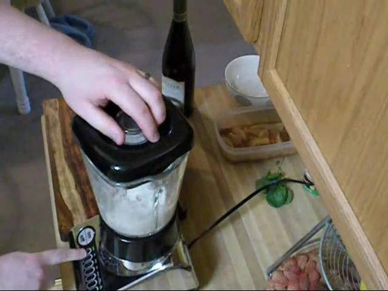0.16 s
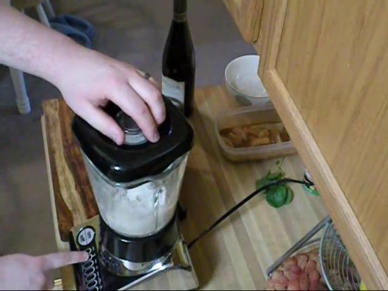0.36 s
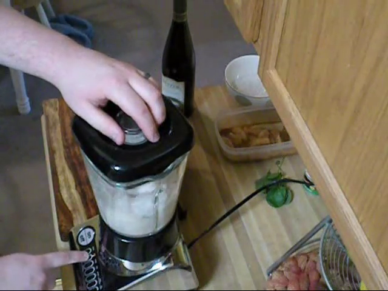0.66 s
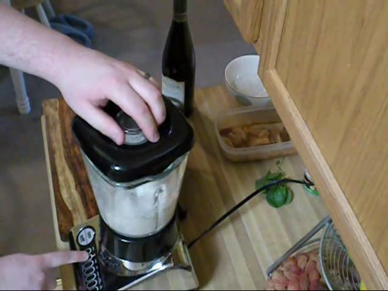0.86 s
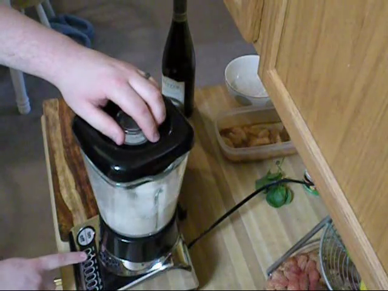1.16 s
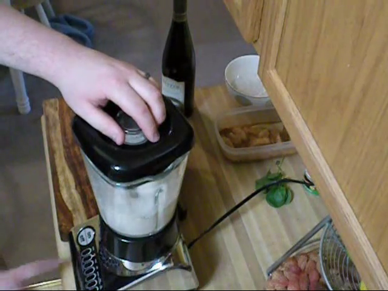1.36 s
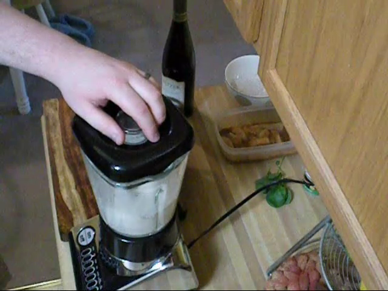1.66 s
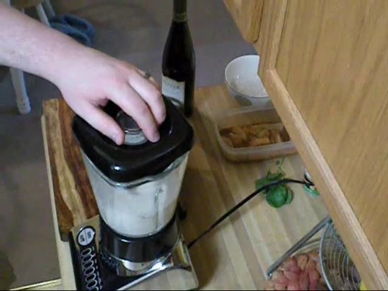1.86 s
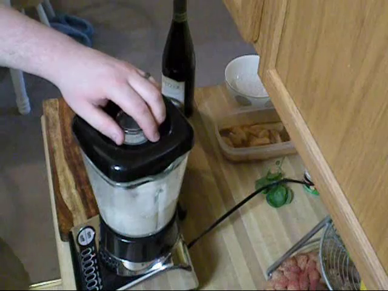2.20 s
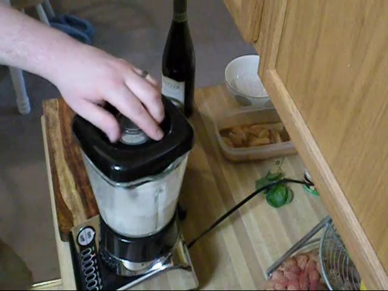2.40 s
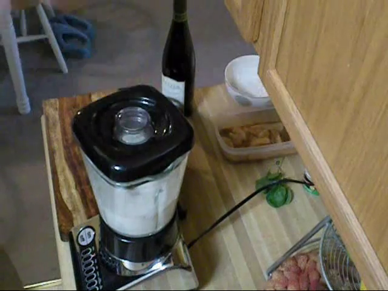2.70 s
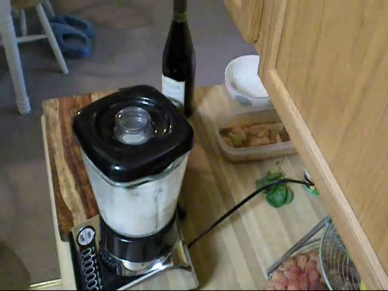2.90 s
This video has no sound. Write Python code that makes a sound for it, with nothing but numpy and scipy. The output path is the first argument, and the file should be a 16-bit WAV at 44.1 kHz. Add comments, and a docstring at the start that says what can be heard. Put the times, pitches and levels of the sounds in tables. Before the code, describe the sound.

After a brief near-quiet with small plastic clicks, a blender snaps on and runs loudly to the end, buzzing and whining upward while chunks rattle the jar; short room echo, coarse, gritty small-camera sound.

```python
"""A kitchen blender whines: its motor comes on after 0.6 s and its whine climbs as it gathers speed,
its torque pulsing at twice the mains rate. Before that a finger ticks on the plastic buttons and the
switch snaps: short noise rings the panel. Blades churn the food (gritty noise), the housing drones
(shaken resonances), chunks knock the glass jar. The kitchen adds a short echo and faint noise.
A small camera stores 8 bits at about 8 kHz and plays each value held flat."""
import sys
import numpy as np
from scipy import signal
from scipy.fft import rfft, irfft
from scipy.io import wavfile
from scipy.ndimage import uniform_filter1d, map_coordinates

SR = 44100
rng = np.random.default_rng(int(sys.argv[2]) if len(sys.argv) > 2 else 0)


def decibels_to_gain(level_db):
    """Convert a level in decibels to a linear amplitude gain (20 dB per decade)."""
    exponent = np.asarray(level_db, float) / 20
    return 10 ** exponent


def persist_wave(psi):
    """Save psi, clipped to +-1, as 16-bit WAV."""
    counts = np.round(np.clip(psi, -1, 1) * 32767).astype(np.int16)
    wavfile.write(sys.argv[1], SR, np.atleast_2d(counts).T)


N = 134505
T = np.arange(N) / SR
START_S = 0.619  # the motor comes on


def level(x, db):
    """Scale a sound to an rms level."""
    return x * decibels_to_gain(db) / np.sqrt(np.mean(x ** 2))


def column(table, index):
    """Draw one column of a table as a curve over time, one value per sample."""
    rows = np.array(table, float)
    return np.interp(T, rows[:, 0], rows[:, index])


def coloured(x, points):
    """Filter x by a spectrum drawn through (f/Hz, level/dB) points, straight over log frequency."""
    hz, db = np.array(points, float).T
    f = np.maximum(np.arange(len(x) // 2 + 1) * SR / len(x), 1)
    gain = decibels_to_gain(np.interp(np.log(f), np.log(hz), db))
    return irfft(rfft(x) * gain, len(x))


def ring(x, hz, t60):
    """One resonance struck by x: it swings at hz and fades by 60 dB in t60 seconds."""
    r = np.exp(-np.log(1000) / (t60 * SR))
    w = 2 * np.pi * hz / SR
    return signal.lfilter([0, np.sin(w)], [1, -2 * r * np.cos(w), r * r], x)


def walk(rate):
    """A smooth random curve: new values at this rate per second, smoothed twice to a spread of about 1."""
    k = int(SR / rate)
    steps = np.repeat(rng.standard_normal(N // k + 1), k)
    smooth = uniform_filter1d(uniform_filter1d(steps, k), k)
    return 1.234 * smooth[:N]


def resonances(table, flicker_db):
    """Resonances shaken by noise, each flickering alone."""
    out = np.zeros(N)
    for hz, width, db in table:
        t60 = np.log(1000) / (np.pi * width)
        shaken = ring(rng.standard_normal(N), hz, t60)
        out += level(shaken, db) * decibels_to_gain(flicker_db * walk(15))
    return out


# Colour of the kitchen's background noise: f/Hz, relative level/dB per Hz
KITCHEN_COLOUR = [(18, -56), (30, -28.5), (178, -13), (210, -8.5), (242, -8), (291, -3.5), (412, -7.5),
                  (1660, -13), (4000, -21.5), (5200, -53), (8800, -120)]


def kitchen_noise():
    """Faint noise of the kitchen, wavering slightly in level."""
    noise = coloured(rng.standard_normal(N), KITCHEN_COLOUR)
    return level(noise, -47) * decibels_to_gain(1.5 * walk(21))


# Resonances of the plastic panel: f/Hz, relative level/dB, t60/s
PLASTIC = [(228, -19, 0.036), (650, -15.5, 0.035), (902, -1, 0.033), (1383, -5, 0.031), (2100, -12, .015),
           (2530, -9, 0.01), (2820, -1.5, .015), (3026, 0, 0.017), (3430, -1, 0.013), (3730, -3, 0.02),
           (3830, -11, 0.0099)]
# Scrapes on the buttons, the last is the switch:
# t/s, relative level/dB, fade time constant/s, treble tilt of the ringing/dB per octave
BUTTONS = [(.002, -44.5, .02, 4), (0.07, -27, 0.01, 1.5), (.091, -35.5, 0.0046, 1.3),
           (.105, -42, 0.018, 3.5), (.35, -43.5, 0.019, 4), (.372, -41, 0.011, 2.5), (0.441, -38, 0.018, 0),
           (0.556, -43.5, .015, 0), (0.578, -39, 0.016, 6), (0.6194, -13, 0.0041, 7)]


def buttons():
    """Short scrapes of a finger or the switch crackle and ring the plastic panel."""
    contact_rise_s = 0.0012
    crack_db = 19  # broad noise of the contact beside the ringing
    out = np.zeros(N)
    for s, db, length, tilt_db in BUTTONS:
        rise = np.clip((T - s) / contact_rise_s, 0, 1)
        fade = np.exp(-np.maximum(T - s, 0) / length)
        scrape = rng.standard_normal(N) * rise * fade / np.sqrt(length * SR)
        # differences between neighbouring samples favour the treble
        out += decibels_to_gain(db + crack_db) * signal.lfilter([1, -1], [1], scrape)
        for hz, mode_db, t60 in PLASTIC:
            tilt = tilt_db * np.log2(hz / 1000)
            out += decibels_to_gain(db + mode_db + tilt) * ring(scrape, hz, t60)
    return out


def kitchen_echo(dry):
    """The walls answer after 4 ms with a dense echo: noise that fades by 60 dB in t60_s."""
    t60_s, echo_db = 0.3, -17
    t = T[:SR // 2]
    tail = rng.standard_normal(len(t)) * np.exp(-np.log(1000) * t / t60_s) * (t > 0.004)
    tail = tail / np.sqrt(np.sum(tail ** 2))
    return decibels_to_gain(echo_db) * signal.fftconvolve(dry, tail)[:N]


def motor_phase():
    """Phase of the whine in radians: its pitch, wavering a little, added up over time."""
    waver_hz = 4.5
    hz = column(WHINE, index=1) + waver_hz * walk(25.15)
    return 2 * np.pi * np.cumsum(hz) / SR


def mains_phase():
    """Phase in radians of the torque pulses, at twice the mains rate."""
    pulse_hz = 120
    return 2 * np.pi * pulse_hz * T


# The motor's whine and its side lines: t/s, whine f/Hz, then the middle level/dB of the lines
# 3, 2 and 1 mains pulses below the whine, of the whine itself, and of the line 1 pulse above
WHINE = [(.62, 1306, -59, -44, -33, -32, -33), (.78, 1319, -48, -35.5, -37, -55, -34),
         (.885, 1328, -34, -42, -43, -40, -27), (.94, 1339, -48, -54, -40, -29, -28.5),
         (1.02, 1366, -42, -51, -33, -43, -26), (1.16, 1391, -46, -34, -29, -33, -23),
         (1.26, 1393, -35, -36, -32, -45, -31), (1.34, 1395, -46, -32, -31, -27, -23.5),
         (1.42, 1421, -47, -42, -25.5, -25, -40), (1.5, 1442, -60, -40, -25, -19, -32),
         (1.62, 1463, -40, -29, -60, -25.5, -27.5), (1.7, 1475, -41, -34, -53, -24, -38),
         (1.78, 1492, -38, -48, -36, -18, -35), (1.9, 1517, -25.5, -29, -20.5, -24, -27),
         (1.98, 1519, -36, -29, -27.5, -24, -37), (2.06, 1522, -32, -25.5, -21.5, -28, -31),
         (2.18, 1539, -25.5, -20.5, -24.5, -25, -32.5), (2.32, 1548, -37, -28.5, -27, -21.5, -31.5),
         (2.42, 1555, -39, -25, -18, -23, -32), (2.54, 1540, -37, -28.5, -28, -21.5, -41),
         (2.64, 1556, -38, -25, -16, -30, -30), (2.7, 1564, -38, -29, -19.5, -37, -48),
         (2.78, 1578, -39, -46, -19.5, -28, -30), (2.86, 1586, -38, -41, -22.5, -30, -36),
         (2.94, 1563, -28, -49, -19.5, -29, -41), (3.05, 1574, -40, -44, -18.5, -28, -49)]


def whine(phase):
    """The motor whines; its pulsing torque adds lines spaced by the mains pulse, each flickering."""
    flicker_db = 1.5
    out = np.zeros(N)
    for k in range(5):
        db = column(WHINE, index=k + 2) + flicker_db * walk(45)
        side = (k - 3) * mains_phase()
        out += decibels_to_gain(db) * np.sin(phase + side + 2 * np.pi * rng.random())
    return out


# Mains hum: multiple of the mains pulse, middle level/dB
HUM = [(2, -35), (3, -35), (7, -36), (12, -37)]


def mains_hum():
    """Tones at multiples of the mains pulse, each wavering in level."""
    out = np.zeros(N)
    for k, db in HUM:
        tone = np.sin(k * mains_phase() + 2 * np.pi * rng.random())
        out += decibels_to_gain(db + 3.6 * walk(8)) * tone
    return out


# Thin treble tone: t/s, middle f/Hz, middle level/dB
RUN_UP = [(.63, 1900, -57), (.68, 2080, -48), (.74, 2700, -52), (.775, 3000, -32), (.82, 3180, -28),
          (.86, 3260, -32), (.91, 3330, -37), (.97, 3400, -55), (1.05, 3420, -80)]


def run_up():
    """A thin treble tone climbs while the motor gathers speed."""
    hz = column(RUN_UP, index=1) + 25 * walk(80)
    db = column(RUN_UP, index=2) + 2.5 * walk(73)
    return decibels_to_gain(db) * np.sin(2 * np.pi * np.cumsum(hz) / SR)


# Levels while the blender works, also used by the functions further down: t/s, then as level/dB:
# churning, housing drone, jar's rattle, housing's upper ring (all four added to the sound's own level),
# and the middle level of the shaft tone
LOAD = [(.63, -30, -14.5, -33, -39, -68), (.652, -32, -14.5, -33, -34, -71),
        (.73, -33, -19.5, -31, -30, -66), (.755, -27, -22, -21, -26, -69),
        (.8, -30.5, -15.5, -20, -23, -77), (.84, -36, -17.5, -21, -31, -56),
        (.88, -30.5, -17, -27, -14.5, -55), (.96, -30, -17.5, -19.5, -26.5, -68),
        (1.1, -24.5, -22, -26, -26.5, -62), (1.25, -25.5, -21.5, -30, -23, -53),
        (1.33, -25.5, -19.5, -22, -16, -49.5), (1.45, -27.5, -22, -25, -35, -47),
        (1.65, -24, -21.5, -20.5, -35.5, -49.5), (1.85, -24.5, -22, -39, -27, -46.5),
        (2.07, -24, -24.5, -29.5, -28, -61), (2.25, -25, -22.5, -25, -33, -54),
        (2.4, -25.5, -22.5, -33, -30.5, -57.5), (2.55, -26, -30.5, -24.5, -32.5, -47),
        (2.7, -26, -23, -23.5, -32, -52), (2.85, -24.5, -27.5, -27.5, -27, -48),
        (3.05, -25, -18, -30, -31, -55)]


def shaft_tone(phase):
    """The shaft hums low, one turn for every 14 swings of the whine, with a loose phase."""
    db = column(LOAD, index=5) + 3 * walk(20)
    return decibels_to_gain(db) * np.sin(phase / 14 + 0.8 * walk(12))


def motor():
    """All tones of the motor; whine and shaft share one rotation."""
    phase = motor_phase()
    tones = whine(phase) + mains_hum() + run_up() + shaft_tone(phase)
    return np.sqrt(2) * tones  # so that tone levels are rms


# Colour of the churning: f/Hz, relative level/dB per Hz
CHURN_COLOUR = [(18, -50), (30, -39), (54, -29), (145, -17), (237, 0.5), (496, -5.5), (621, 6.5),
                (778, -8.5), (1470, -9), (1730, -6.5), (4000, -2.5), (5200, -24), (8800, -120)]


def churn():
    """Blades whip the food: noise with a quick random flutter that makes it gritty."""
    grit = rng.standard_normal(N) * decibels_to_gain(1.77 * walk(250) + 1.05 * walk(20))
    return level(coloured(grit, CHURN_COLOUR), 4.5) * decibels_to_gain(column(LOAD, index=1))


# Resonances of housing and counter: f/Hz, width/Hz, relative level/dB
HOUSING = [(165, 13, -42), (224, 19, -30.5), (283, 20, -32), (352, 18, -34), (420, 69, -31.5),
           (564, 20, -35.5), (734, 47, -39), (880, 33, -31.5), (937, 57, -31), (1175, 87, -29.5),
           (1440, 83, -31.5), (1620, 180, -34.5), (1893, 54, -37), (2268, 52, -37.5), (2738, 32, -38.5)]
# Droning resonances of the housing: f/Hz, width/Hz, level/dB over the load curve
DRONE = [(634, 24, -3), (683, 24, -6)]
# The housing's upper ring: f/Hz, width/Hz, level/dB over the load curve
UPPER_RING = [(1504, 40, -2)]


def housing():
    """Housing and counter are shaken into ringing at their own pitches."""
    # the food gets smoother and shakes the housing less
    fade_db = 1.0 - 1.0 * (T - START_S)
    body = resonances(HOUSING, flicker_db=1.0) * decibels_to_gain(fade_db)
    drone = resonances(DRONE, flicker_db=1.0) * decibels_to_gain(column(LOAD, index=2))
    upper = resonances(UPPER_RING, flicker_db=2.5) * decibels_to_gain(column(LOAD, index=4))
    return body + drone + upper


# Resonances of the glass jar: f/Hz, relative level/dB, t60/s
JAR = [(2730, -14.5, 0.1), (3000, -16.5, 0.023), (3320, -16.5, 0.037), (3600, -7.5, .04), (3685, -3, 0.052),
       (3817, -11.5, 0.054), (3900, -9, 0.046)]
# Knocks of single chunks: t/s, relative level/dB
CHUNKS = [(0.7288, -18), (0.7472, -13), (0.7622, -9.5), (0.7916, -11), (0.8305, -10.5), (0.9118, -20),
          (0.9273, -18), (0.9483, -9.5), (0.9667, -9), (1.046, -8), (1.074, -10), (1.0919, -14),
          (1.1343, -6), (1.1688, -9), (1.1922, -7), (1.2157, -10), (1.3608, -11), (1.4137, -21),
          (1.4267, -10), (1.4586, -9), (1.5459, -15), (1.5908, -15), (1.6567, -21), (1.723, -15),
          (1.7804, -10), (1.8757, -13), (1.9186, -20), (1.9375, -12), (2.0074, -22), (2.0652, -14),
          (2.151, -12), (2.2393, -19), (2.2753, -18), (2.3451, -26), (2.4404, -22), (2.5656, -10),
          (2.6145, -15.5), (2.7237, -10), (2.7631, -27), (2.8604, -21), (2.9303, -21), (2.9642, -19),
          (2.9916, -25), (3.0161, -15)]


def jar():
    """Chunks and a hail of small bits knock the glass, which rings at its own pitches."""
    bits_per_s, bits_spread_db, bits_db = 1100, 1, -1
    chunk_db, chunk_spread_db = -6, 1.9
    out = np.zeros(N)
    hits = rng.random(N) < bits_per_s / SR
    hail = hits * decibels_to_gain(bits_spread_db * rng.exponential(size=N) + 1.4 * walk(40))
    # every knock excites each resonance a little differently
    share = rng.standard_normal((len(CHUNKS), len(JAR)))
    for k, (hz, db, t60) in enumerate(JAR):
        rattle = ring(hail * rng.standard_normal(N), hz, t60)
        out += level(rattle, db + bits_db) * decibels_to_gain(column(LOAD, index=3))
        blows = np.zeros(N)
        for (s, knock_db), own in zip(CHUNKS, share[:, k]):
            blows[int(s * SR)] = decibels_to_gain(knock_db + chunk_db + chunk_spread_db * own)
        out += decibels_to_gain(db) * ring(blows, hz, t60)
    return out


def scene():
    """The blender and its buttons in a small kitchen."""
    rise_s, bass_cut_hz = 0.011, 205
    on = np.clip((T - START_S) / rise_s, 0, 1)
    body = on * (churn() + housing() + jar()) + buttons()
    # the small housing gives off little bass
    bass_cut = signal.butter(5, bass_cut_hz, "high", fs=SR, output="sos")
    dry = on * motor() + signal.sosfilt(bass_cut, body)
    return (dry + kitchen_echo(dry) + kitchen_noise())[None]


def roll_off(x):
    """The treble ends steeply here."""
    return signal.sosfilt(signal.butter(12, 15750, fs=SR, output="sos"), x)


def record(dry):
    """The camera cuts near half its rate, rounds down to 8 bits, holds each value and cuts the top."""
    camera_hz, steps, top_hz = 8001.46, 128, 15480  # steps on each side of zero
    low_pass = signal.butter(12, 1.03 * camera_hz / 2, fs=SR, output="sos")
    x = signal.sosfiltfilt(low_pass, dry[0])
    ticks = np.arange(int(N * camera_hz / SR) + 1)
    sampled = map_coordinates(x, [ticks * SR / camera_hz], mode="mirror")
    stored = np.clip(np.floor(steps * sampled), -steps, steps - 1) / steps
    held = stored[(T * camera_hz).astype(int)]
    top_cut = signal.ellip(10, 0.1, 40, top_hz, fs=SR, output="sos")
    mix = signal.sosfiltfilt(top_cut, held)[None]
    return roll_off(mix)


dry = scene()
out = record(dry)
persist_wave(out)
```